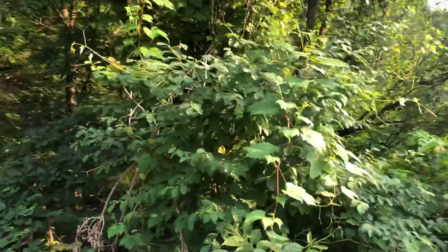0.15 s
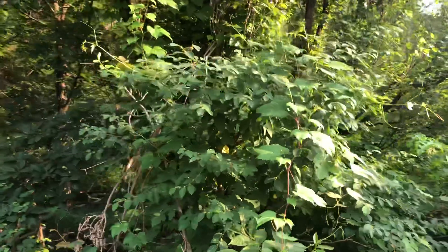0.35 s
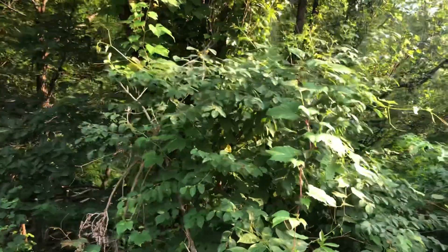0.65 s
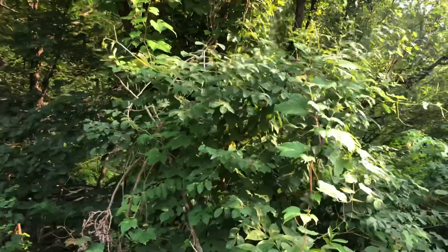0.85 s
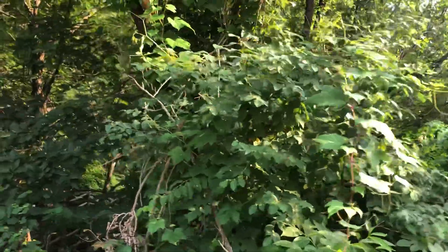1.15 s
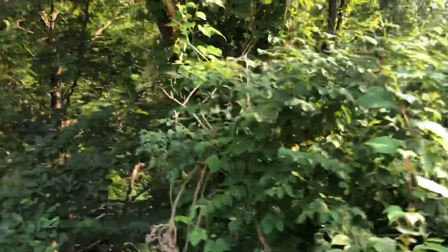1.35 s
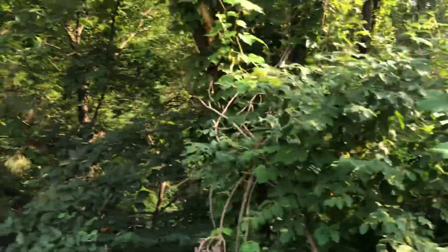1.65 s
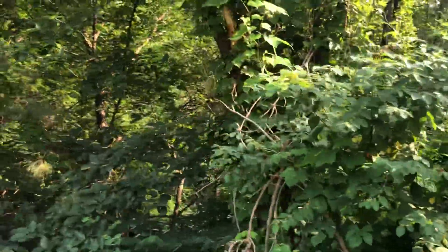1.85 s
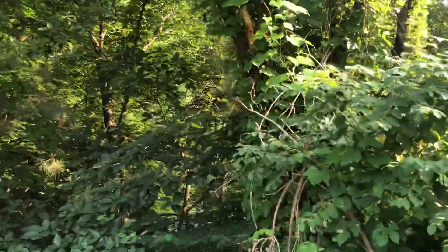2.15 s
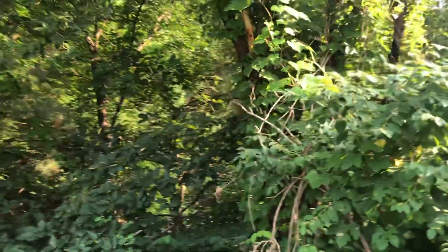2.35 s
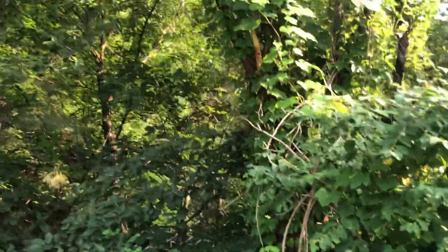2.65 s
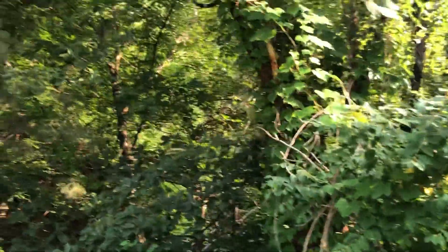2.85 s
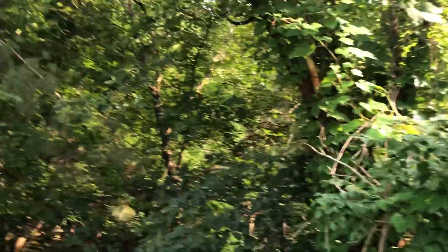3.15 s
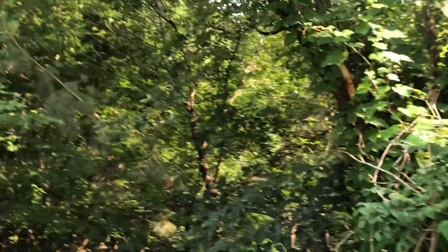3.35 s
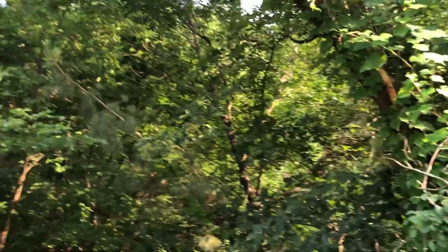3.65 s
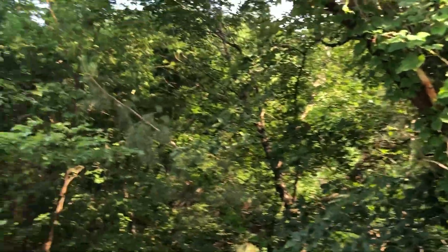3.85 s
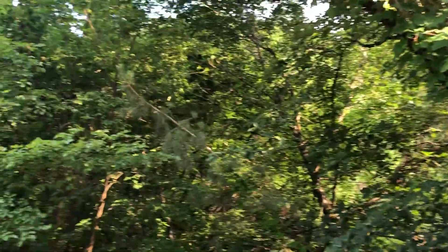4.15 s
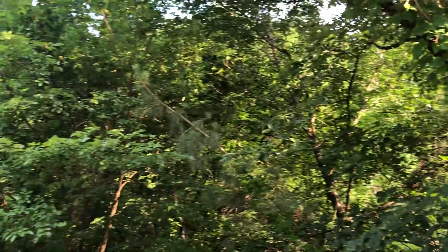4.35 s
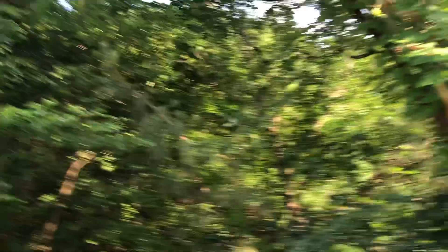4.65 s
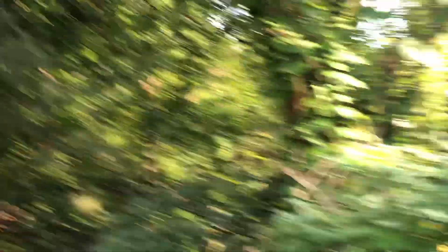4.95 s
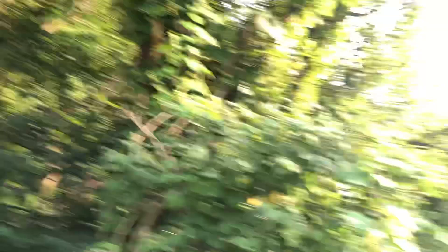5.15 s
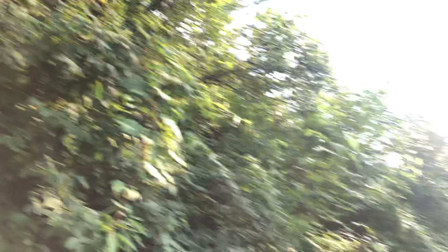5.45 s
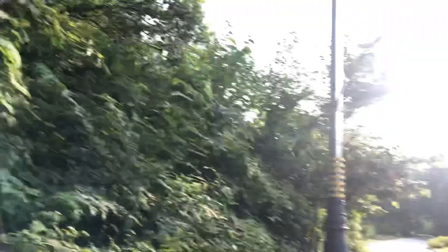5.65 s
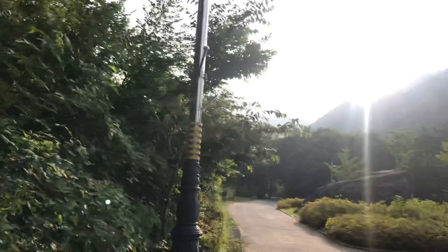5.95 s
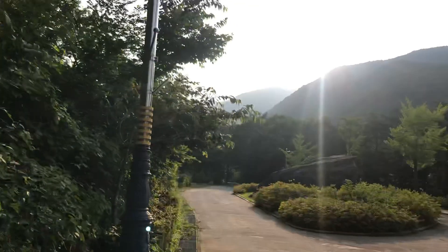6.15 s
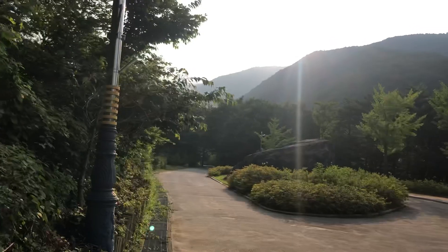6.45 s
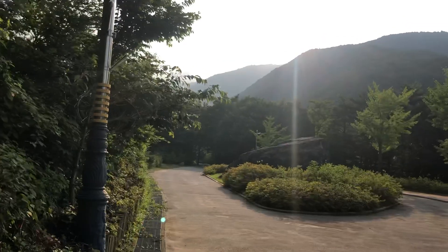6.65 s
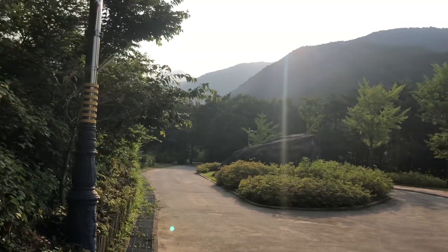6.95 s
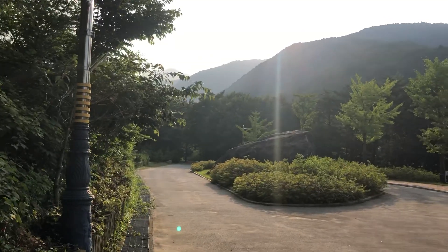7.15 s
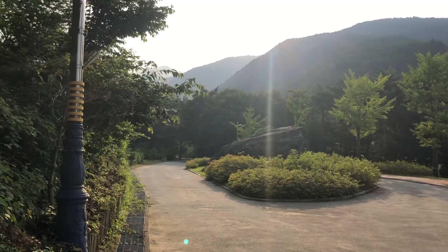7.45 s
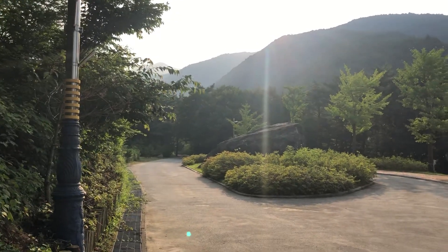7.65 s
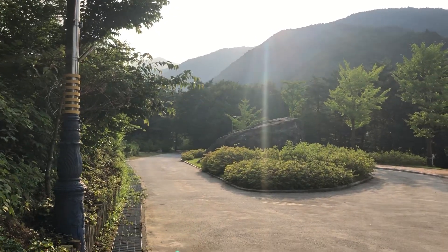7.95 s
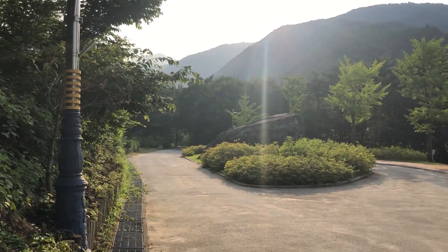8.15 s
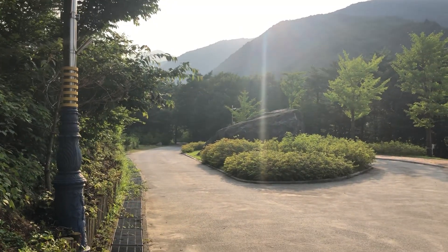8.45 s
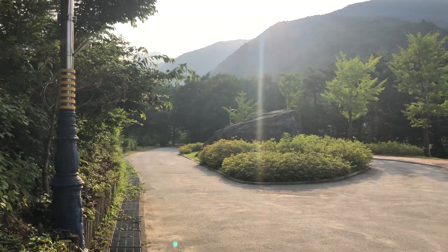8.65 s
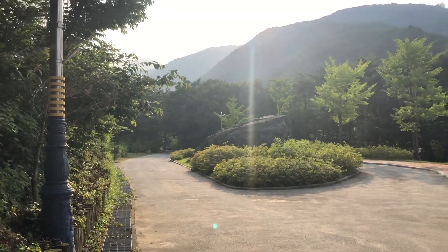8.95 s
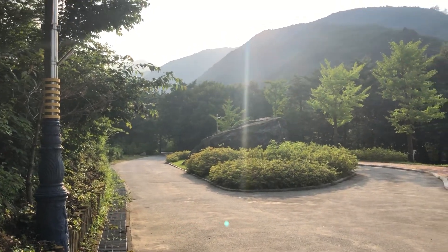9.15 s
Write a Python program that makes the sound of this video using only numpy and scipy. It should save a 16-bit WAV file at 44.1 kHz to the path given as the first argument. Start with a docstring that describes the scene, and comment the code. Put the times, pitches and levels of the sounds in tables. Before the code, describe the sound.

A dense cicada chorus sizzles high and steady in a summer wood, with whines and rasps, thinning slightly midway as nearer insects stop.

```python
"""Cicadas sing all through a summer wood; the camera turns from the trees to an open path.
From the start a massed chorus of tymbal clicks sizzles near 8 kHz over noise shaped as a valley's murmur.
Resonant groups, gliding whines, very high lisps and far rasps join it, with taps and rubs on the camera.
A distant vehicle, two harmonics of its firing rate, pulls away until 2.2 s; faint bird notes are sines.
Near 5.5 s the nearer group drops; as the camera turns, far song falls slightly and the murmur rises."""
import sys
import numpy as np
from scipy import signal
from scipy.fft import rfft, irfft, next_fast_len
from scipy.io import wavfile

SR = 44100
rng = np.random.default_rng(int(sys.argv[2]) if len(sys.argv) > 2 else 0)


def generate_wav(signal):
    """Clip the signal to [-1, 1] and save it as 16-bit WAV at the path in sys.argv[1]."""
    frames = np.transpose(np.atleast_2d(signal))
    scaled = np.clip(frames, -1, 1) * 32767
    pcm = np.round(scaled).astype(np.int16)
    wavfile.write(sys.argv[1], SR, pcm)


N = 410571
T = np.arange(N) / SR  # t/s of every sample


def gain_of(db):
    """Logarithmic level: decibels to an amplitude ratio."""
    return 10 ** (np.asarray(db) / 20)


def evened(x):
    """Power normalisation: scales to rms 1."""
    return x / np.sqrt(np.mean(x ** 2) + 1e-20)


def follow(rows):
    """Linear interpolation: every column after t/s, at every sample."""
    s, *columns = np.transpose(rows)
    return [np.interp(T, s, column) for column in columns]


def noise():
    """White noise: equal mean power at all frequencies."""
    return rng.standard_normal(N)


def tone(hz):
    """Phase accumulation: a sine whose phase is the running sum of its frequency."""
    return np.sin(2 * np.pi * np.cumsum(hz) / SR)


def coloured(x, points):
    """Spectral shaping: filters x by (f/Hz, level/dB), falling 60 dB per octave more outside; rms 1."""
    size = next_fast_len(N)
    octave = np.log2(np.fft.rfftfreq(size, 1 / SR) + 1)
    hz, db = np.transpose(points)
    outside = abs(octave - np.clip(octave, np.log2(hz[0]), np.log2(hz[-1])))
    response = gain_of(np.interp(octave, np.log2(hz), db) - 60 * outside)
    return evened(irfft(rfft(x, size) * response, size)[:N])


def wander(rate):
    """Random modulation: a chance curve of rms 1 with rate new values a second."""
    return evened(np.interp(T * rate, np.arange(N), noise()))


def resonate(x, hz, width):
    """Heterodyne resonance: shifts hz to zero, low-passes with a double pole and shifts back."""
    turn = np.exp(2j * np.pi * np.cumsum(hz * np.ones(N)) / SR)
    r = np.exp(-np.pi * width / SR)
    lowered = x / turn + 1e-18
    return 2 * (turn * signal.lfilter([(1 - r) ** 2], [1, -2 * r, r * r], lowered)).real


def gate(start, end, edge):
    """Amplitude envelope: opens at start and shuts at end, with linear edges."""
    return np.clip(np.minimum(T - start, end - T) / edge, 0, 1)


def tymbal(rate, jitter):
    """Buckling impulses: one click per turn of an uneven phase; rms 1."""
    turns = np.cumsum(rate * (1 + jitter * wander(150))) / SR
    return evened(np.diff(np.floor(turns), prepend=0) + 0.)


def woods(x, wet, t60, size=8192):
    """Multiple scattering from trunks and leaves: direct sound plus decaying tails, redrawn per block."""
    t, hop = np.arange(size) / SR, size // 2
    scatter = np.zeros(N + 4 * size)
    padded = np.pad(x, (hop, size))
    window = np.sin(np.pi * np.arange(size) / size)
    for at in range(0, N + hop, hop):
        tail = rng.standard_normal(size) * gain_of(-60 * t / t60)
        tail /= np.linalg.norm(tail)
        scatter[at:at + 2 * size - 1] += signal.fftconvolve(padded[at:at + size] * window, tail)
    return (x + wet * scatter[hop:][:N]) / np.sqrt(1 + wet ** 2)


def swarm(rate, jitter, blur, wet, count):
    """Incoherent superposition: singers at their own click rates, blurred by noise for farther ones."""
    clicks = np.zeros(N)
    for _ in range(count):
        own_rate = rate * rng.uniform(.7, 1.3) * (1 + .01 * wander(3))
        clicks += tymbal(own_rate, jitter) * gain_of(2 * wander(1.977))
    scattered = evened(woods(clicks - clicks.mean(), wet, t60=0.15))
    return np.sqrt(1 - blur) * scattered + np.sqrt(blur) * noise()


TURN_START_S, TURN_END_S = 5.2, 5.7


def turned():
    """Linear rotation of the camera: 0 facing the trees, 1 facing the path."""
    return np.interp(T, [TURN_START_S, TURN_END_S], [0, 1])


# spectral shape of the murmur before its low cut: f/Hz, relative level/dB [dB per Hz]
MURMUR_SPECTRUM = [(15, -36), (25, -17), (59, -7), (75, -9), (103, -8.5), (130, -1.5), (156, -2), (202, -2),
                   (243, -7), (437, -16.5), (757, -19), (996, -20), (1630, -22.5), (2000, -23), (2600, -20),
                   (4400, -120)]
# steady hums: f/Hz, level/dB, bandwidth/Hz
VALLEY_HUMS = [(87.2, -64, 9), (127.2, -61, 10.5), (218, -69, 4)]
VALLEY_DB, VALLEY_TURN_DB = -54.5, 1.05  # level facing the trees before the low cut, change at the path


def valley(low_cut_hz=36):
    """Band-shaped noise: low murmur of far traffic, with narrow resonances of noise as wavering hums."""
    level = gain_of(VALLEY_DB + VALLEY_TURN_DB * turned() + .5 * wander(6.6))
    murmur = coloured(noise(), MURMUR_SPECTRUM) * level
    low_cut = signal.butter(4, low_cut_hz, "highpass", fs=SR, output="sos")
    murmur = signal.sosfilt(low_cut, murmur)
    hums = sum(gain_of(db) * evened(resonate(noise(), hz, width)) for hz, db, width in VALLEY_HUMS)
    return murmur + hums


# the distant vehicle speeds up, then eases off: t/s, mean firing rate f/Hz
FIRING_RATE = [(0, 55), (1.5, 88.1), (2.02, 95.4), (2.2, 78)]
ENGINE_DB = -53.5  # mean level of each harmonic inside the exhaust's range
# the exhaust carries about one octave
EXHAUST_LOW_HZ, EXHAUST_HIGH_HZ, EXHAUST_DB_PER_OCTAVE = 80.4, 150.7, 58


def vehicle():
    """Harmonics through a pass band: the second climbs out of the exhaust's range as the first climbs in."""
    rate = follow(FIRING_RATE)[0] * (1 + 0.007 * wander(14.7))
    out = np.zeros(N)
    for hz in (rate, 2 * rate):
        octaves_outside = abs(np.log2(hz / np.clip(hz, EXHAUST_LOW_HZ, EXHAUST_HIGH_HZ)))
        db = ENGINE_DB - EXHAUST_DB_PER_OCTAVE * octaves_outside + 0.82 * wander(15)
        out += evened(tone(hz)) * gain_of(db)
    return out * gate(FIRING_RATE[0][0], FIRING_RATE[-1][0], 0.06)


# faint notes of far birds, before scatter: t/s, length/s, mean f/Hz, level/dB
BIRD_NOTES = [(1.09, 0.12, 1396, -63), (3.946, 0.25, 648, -69), (8.41, 0.065, 1470, -63)]


def birds():
    """Frequency-modulated sines: plain, faint, slightly unsteady notes from far off."""
    notes = np.zeros(N)
    for s, length, hz, db in BIRD_NOTES:
        note = evened(tone(hz * (1 + 0.008 * wander(60))))
        notes += gain_of(db) * gate(s, s + length, .03) * note
    return woods(notes, wet=0.56, t60=.25)


# soft rubs of the hand: t/s, length/s, mean level/dB
HAND_RUBS = [(0.066, 0.12, -61.5), (1.026, 0.17, -61), (6.617, 0.27, -64), (7.75, 0.31, -66.5),
             (8.36, 0.13, -63)]
# spectral shape of the rubs: f/Hz, relative level/dB
RUB_SPECTRUM = [(150, -18), (350, 2.5), (900, -3.5), (1400, 0), (2200, -4), (4000, -35)]
# finger taps on the camera: t/s, level/dB at the envelope's peak (thud apart), ring f/Hz
FINGER_TAPS = [(.145, -46, 328), (1.045, -42, 620), (2.025, -42, 306), (2.522, -45.5, 400),
               (2.541, -40, 168), (5.215, -50, 55.2), (5.55, -41, 260), (6.319, -30, 1026),
               (9.05, -39.5, 380), (9.084, -40, 428)]


def handling(ring_cycles=0.76, thud_ratio=0.59, thud_db=-9):
    """Friction noise and damped vibration: fingers rub the camera's case and tap it over a duller thud."""
    out = coloured(noise(), RUB_SPECTRUM) * gain_of(4.1 * wander(70))
    out *= sum(gain_of(db) * gate(s, s + length, 0.036) for s, length, db in HAND_RUBS)
    for s, db, hz in FINGER_TAPS:
        on = (T >= s) & (T < s + .15)
        cycles = hz * (T[on] - s)
        ring = np.sin(2 * np.pi * cycles) + gain_of(thud_db) * np.sin(2 * np.pi * thud_ratio * cycles)
        age = cycles / ring_cycles  # the envelope peaks at age 1
        out[on] += gain_of(db) * age * np.exp(1 - age) * ring
    return out


# spectral shape of the singers behind the rasping ones: f/Hz, relative level/dB [dB per Hz]
FAR_SPECTRUM = [(1120, -63), (1900, -22.5), (2490, -6.5), (3110, -4), (3450, 1), (3600, -2.5), (4000, -7.5),
                (4400, -20), (5720, -48), (9680, -120)]
FAR_DB, FAR_TURN_DB = -46.5, -2.05  # mean level facing the trees, and its change once turned away


def far_singers(slide_hz=140, slides=0.51):
    """Band-shaped clicks and frequency modulation: a dull band from deeper in the wood, with sliding notes."""
    song = coloured(swarm(rate=200, jitter=.015, blur=0.48, wet=0.93, count=4), FAR_SPECTRUM)
    threads = np.zeros(N)
    for hz, db in [(2650, -6.5), (2900, -4.5), (3150, -3.5), (3450, 1.0), (3520, -1)]:  # f/Hz, relative level/dB
        pitch = hz + slide_hz * wander(12) + 38 * wander(250)
        threads += gain_of(db + 2.7 * wander(13)) * tone(pitch)
    song = evened(song + slides * evened(woods(threads, wet=0.6, t60=0.18)))
    return song * gain_of(FAR_DB + FAR_TURN_DB * turned() + 0.4 * wander(9.9))


# short falling notes among the far singers, before scatter: t/s, mean starting f/Hz, level/dB
FALLING_NOTES = [(.58, 3900, -53), (.82, 3160, -51), (2.0, 3200, -53), (2.52, 3420, -48),
                 (3.12, 3205, -50.5), (3.68, 3440, -49), (4.76, 3410, -51)]
SLUR_S, SLUR_FALL_HZ_PER_S = .14, 1500


def slurs(unsteady_hz=35):
    """Linear frequency sweep: brief whistles slide downwards, softened by the trees."""
    out = np.zeros(N)
    shake = unsteady_hz * wander(250)
    for s, hz, db in FALLING_NOTES:
        on = (T >= s) & (T < s + SLUR_S)
        t = T[on] - s
        pitch = hz - SLUR_FALL_HZ_PER_S * t + shake[on]
        out[on] += gain_of(db) * evened(np.sin(np.pi * t / SLUR_S) * tone(pitch))
    return woods(out, wet=0.74, t60=0.21)


# the clearest rasping calls, before scatter: t/s, length/s, mean level/dB
CLEAR_RASPS = [(1.188, .2, -40), (1.39, .12, -47), (1.72, 0.19, -47), (2.75, 0.17, -42), (3.759, 0.22, -46),
               (4.259, .16, -40.5), (4.44, .09, -45.5), (5.07, .14, -46), (5.758, .13, -47.5),
               (6.329, 0.14, -43.5), (7.2, .1, -47.5), (7.58, 0.094, -44), (8.79, .1, -45)]
# body resonances: mid-bend f/Hz, bandwidth/Hz, relative level/dB
RASP_RESONANCES = [(2510, 190, -7.5), (2970, 260, -5), (3485, 360, 3)]
FAINT_RASP_DB, FAINT_RASP_S, FAINT_RASP_GAP_S = -56.5, .12, .6  # one fainter call at random in each gap


def rasps(click_hz=172, sag=.25, edge=0.028, bend=0.04, ragged_db=1.7):
    """Source and filter: slow clicks, sagging in rate, excite three resonances that bend up in mid-call."""
    faint = [(FAINT_RASP_GAP_S * (k + chance), FAINT_RASP_S, FAINT_RASP_DB)
             for k, chance in enumerate(rng.random(size=16))]
    level, arch, rate = np.zeros(N), np.zeros(N), np.full(N, float(click_hz))
    for s, length, db in [*faint, *CLEAR_RASPS]:
        level = np.maximum(level, gain_of(db) * gate(s, s + length, edge))
        on = (T >= s) & (T < s + length)
        age = T[on] - s
        rate[on] = click_hz * rng.uniform(.9, 1.2) * (1 - sag * age)
        arch[on] = np.sin(np.pi * age / length)
    clicks = tymbal(rate, jitter=.007) + .25 * noise()
    bent = 1 + bend * (arch - .5)
    voice = evened(sum(gain_of(db) * resonate(clicks, hz * bent, width) for hz, width, db in RASP_RESONANCES))
    return woods(level * gain_of(ragged_db * wander(50)) * voice, wet=1.0, t60=0.12)


# lisping swells, some of them lower: t/s of the crest, f/Hz of the lower ring, level/dB of that ring
LISP_CRESTS = [(1.0, 11650, -40), (2.3, 11700, -47), (2.55, 11380, -42.5), (3.63, 11900, -43),
               (4.07, 11330, -43), (4.88, 11900, -42.5), (6.14, 11690, -43), (7.38, 11800, -42.5),
               (8.57, 11700, -43.5)]


def lisps(rise=0.27, fall=0.096, flick_after=0.122, flick_width=0.023, flick_db=-0.5, upper=1.23, upper_db=-4.5):
    """Paired resonances: a very high hiss swells in quick throbs, breaks off and ends in a wider-band flick."""
    swell, flick = np.zeros(N), np.zeros(N)
    for crest, _, db in LISP_CRESTS:
        corners = [crest - rise, crest - .04, crest + 0.017, crest + fall]
        swell += gain_of(db) * np.interp(T, corners, [0, 1, 1, 0])
        flick += gain_of(db + flick_db) * np.exp(-((T - crest - flick_after) / flick_width) ** 2)
    hz = follow(LISP_CRESTS)[0]
    clicks = swarm(rate=450, jitter=.05, blur=0.72, wet=0.35, count=2)
    ring = evened(resonate(clicks, hz, width=1140))
    ring += gain_of(upper_db) * evened(resonate(clicks, hz * upper, width=1400))
    hiss = swell * gain_of(1.1 * wander(35)) * ring
    return hiss + flick * coloured(clicks, [(10000, -5), (11500, 5), (15500, -10)])


# single singers, before scatter: start t/s, end t/s, first f/Hz, last f/Hz, level/dB before tiring,
# rms pitch unsteadiness/Hz
WHINING_SINGERS = [(-.2, 1.6, 6100, 6270, -40, 55), (1.6, 2.5, 6350, 6300, -38, 90),
                   (1.0, 3.1, 5800, 5720, -43.5, 60), (2.1, 3.85, 6740, 6930, -33, 55),
                   (2.4, 4.7, 6000, 5980, -40, 45), (2.5, 4.65, 6170, 6250, -35, 55),
                   (2.9, 4.82, 5660, 5520, -37.5, 62), (3.9, 5.45, 6480, 6600, -36, 60),
                   (4.5, 5.47, 5940, 5950, -38, 75), (5.4, 6.3, 7520, 7460, -42, 16),
                   (6.55, 8.23, 5980, 6170, -45, 65), (6.3, 9.5, 7850, 7900, -38, 18)]


def whines(click_hz=355, throb=0.44, rise=0.28, stop=0.064, tire_db=2.5):
    """Amplitude and frequency modulation: gliding notes swell, throb at a tymbal beat, tire and stop short."""
    out = np.zeros(N)
    for start, end, first_hz, last_hz, db, unsteady_hz in WHINING_SINGERS:
        age = np.interp(T, [start, end], [0, 1])
        hz = first_hz + (last_hz - first_hz) * age + unsteady_hz * wander(260)
        level = np.clip(np.minimum((T - start) / rise, (end - T) / stop), 0, 1)
        on = level > 0
        beat = 1 + throb * np.sin(2 * np.pi * click_hz * rng.uniform(1.0, 1.03) * T[on])
        tiring = gain_of(db - tire_db * age[on] ** 2)
        out[on] += tiring * level[on] * evened(beat * tone(hz[on]))
    return woods(out, wet=0.83, t60=0.13)


# the group in the nearest trees: t/s, mean level/dB before the stop, body resonance f/Hz
GROUP_CURVE = [(0, -30.5, 7370), (1.3, -31.5, 6980), (2.0, -27.5, 6840), (3.2, -33.5, 6400),
               (5.3, -32, 6920)]
GROUP_STOP_S, GROUP_STOP_LENGTH_S, GROUP_DROP_DB = 5.54, 0.36, 19  # all but a few break off together


def near_group():
    """Moving resonance: clicks ring lower as the group first swells, later climb back, and drop away."""
    db, hz = follow(GROUP_CURVE)
    stopped = np.interp(T, [GROUP_STOP_S - GROUP_STOP_LENGTH_S, GROUP_STOP_S], [0, 1])
    clicks = swarm(rate=480, jitter=.008, blur=0.22, wet=0.56, count=4)
    ring = resonate(clicks, hz, width=1820)
    song = coloured(ring, [(4300, -8.0), (5600, -4.5), (7800, 0), (10500, -28)])
    return song * gain_of(db - GROUP_DROP_DB * stopped ** 2 + 0.2 * wander(29.7))


# spectral shape of the massed chorus: f/Hz, relative level/dB [dB per Hz]
CHORUS_SPECTRUM = [(2470, -65), (4200, -29), (4540, -28.5), (5230, -20.5), (5940, -18), (6590, -15),
                   (7480, -4.5), (7600, -4), (8120, 0), (9210, -7.5), (9940, -16), (10800, -21),
                   (13900, -28), (15600, -26.5)]
# slow swells of the chorus: t/s, level/dB before the gain level_db
CHORUS_SWELLS = [(0.0, -32), (0.23, -31), (2.36, -33.5), (2.77, -31.5), (4.33, -31.5), (5.56, -29.5),
                 (6.38, -31.5), (9.2, -32)]
# fizz at the very top: mean level, then its swell, strongest at the height of the song
FIZZ_DB, FIZZ_SWELL_DB, FIZZ_FROM_S, FIZZ_TO_S, FIZZ_EDGE_S = -52.5, 5.5, 1.4, 6.4, 0.92


def chorus(level_db=3.0):
    """Spectral shaping of massed impulses: clicks sizzle as in many small bodies, fluttering as a whole."""
    song = coloured(swarm(rate=400, jitter=.004, blur=0.34, wet=0.66, count=10), CHORUS_SPECTRUM)
    song *= gain_of(follow(CHORUS_SWELLS)[0] + level_db + 0.32 * wander(45))
    fizz_db = FIZZ_DB + FIZZ_SWELL_DB * gate(FIZZ_FROM_S, FIZZ_TO_S, FIZZ_EDGE_S)
    fizz = coloured(noise(), [(9000, -8), (10500, 4), (15500, -3)])
    return song + fizz * gain_of(fizz_db + 2.3 * wander(40))


def scene():
    """Linear superposition: all sources add at one microphone, heard alike in both ears."""
    surroundings = valley() + vehicle() + birds() + handling()
    insects = far_singers() + slurs() + rasps() + lisps() + whines() + near_group() + chorus()
    mono = surroundings + insects
    return np.array([mono, mono])


EDGE_HZ = 15750


def record(dry):
    """Linear-phase low-pass filtering: the recorder's band ends at EDGE_HZ."""
    low_pass = signal.firwin(611, EDGE_HZ, window=("kaiser", 9), fs=SR)
    return signal.oaconvolve(dry, low_pass[None], "same")


dry = scene()
out = record(dry)
generate_wav(out)
```